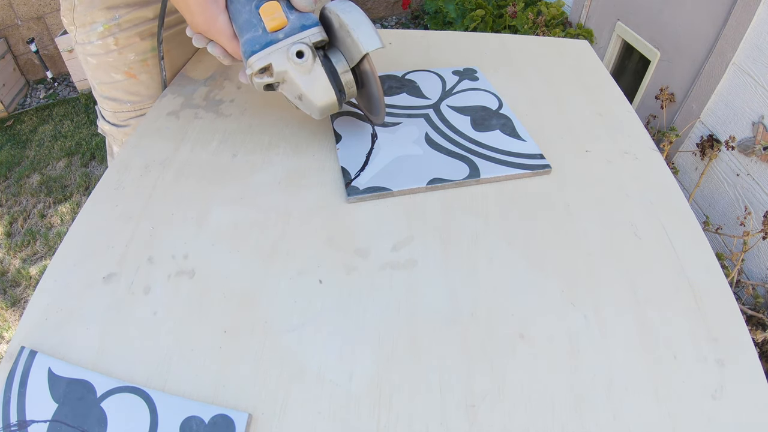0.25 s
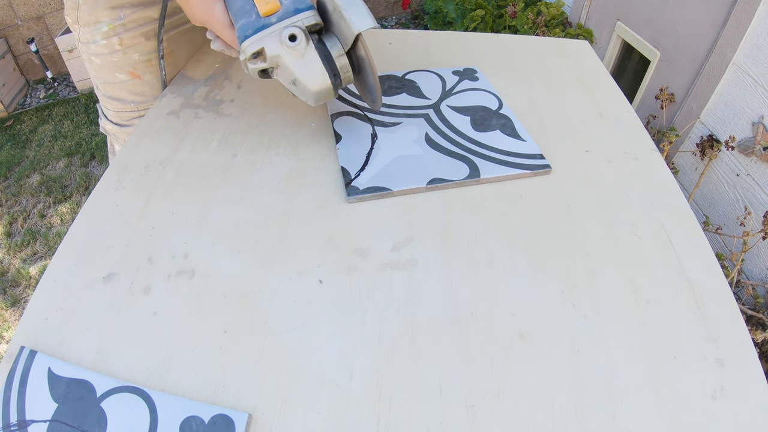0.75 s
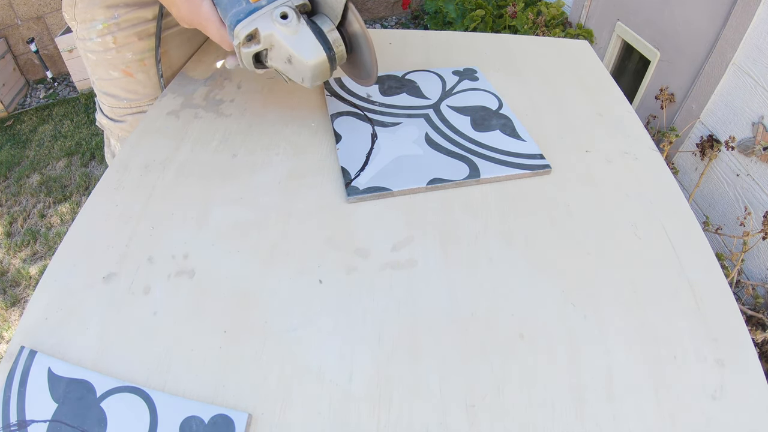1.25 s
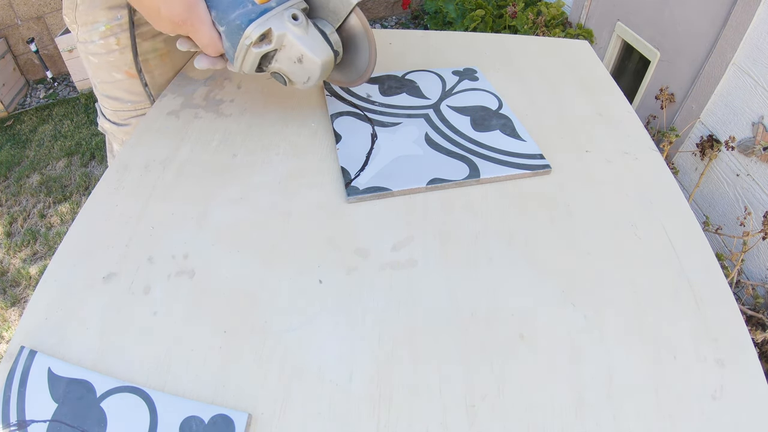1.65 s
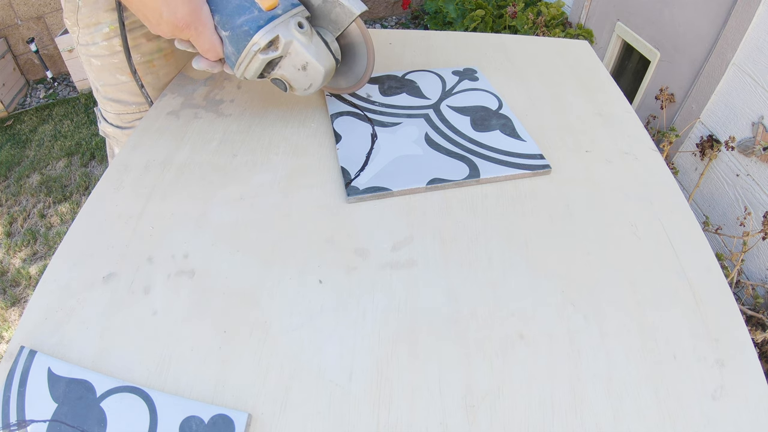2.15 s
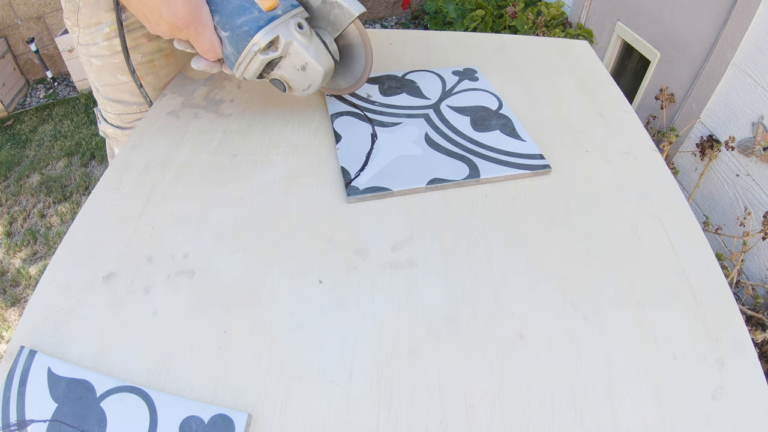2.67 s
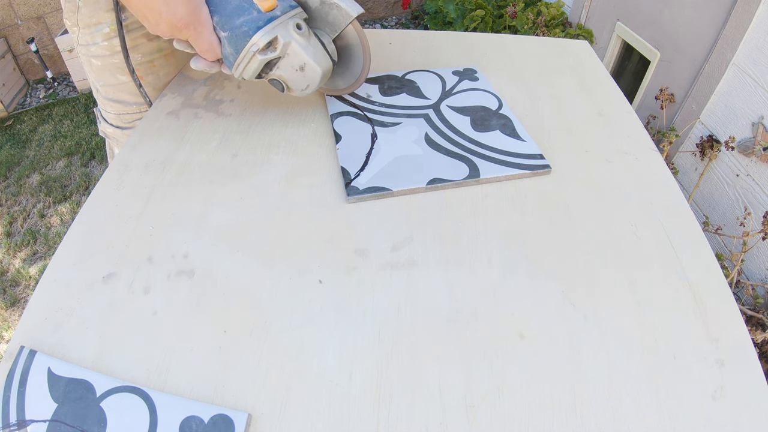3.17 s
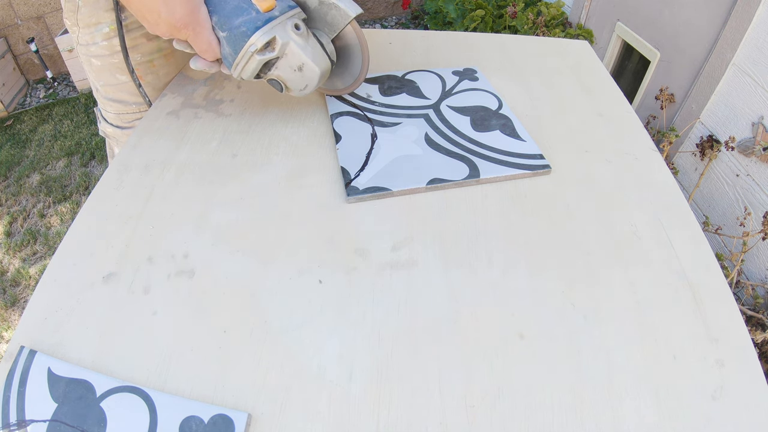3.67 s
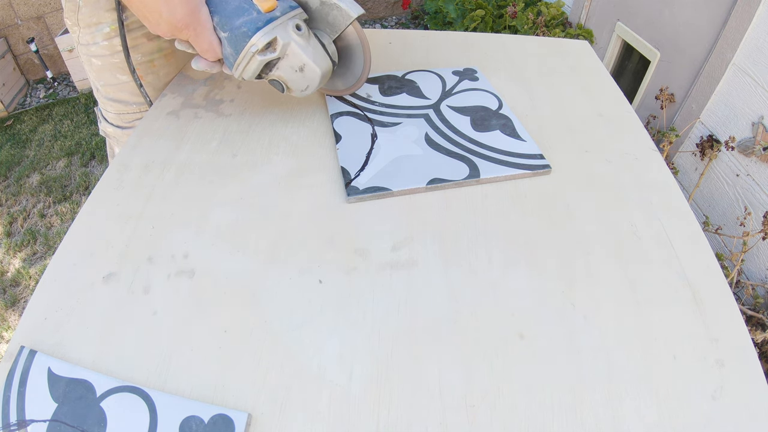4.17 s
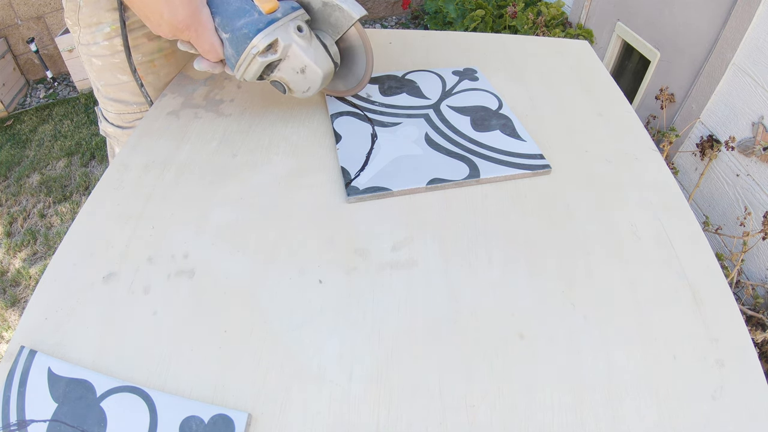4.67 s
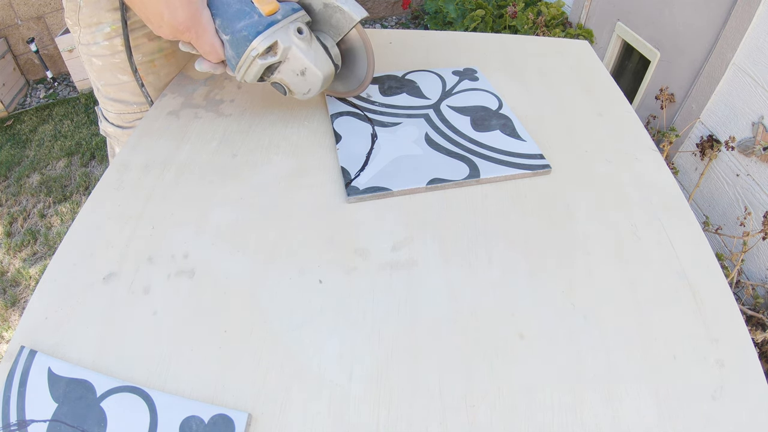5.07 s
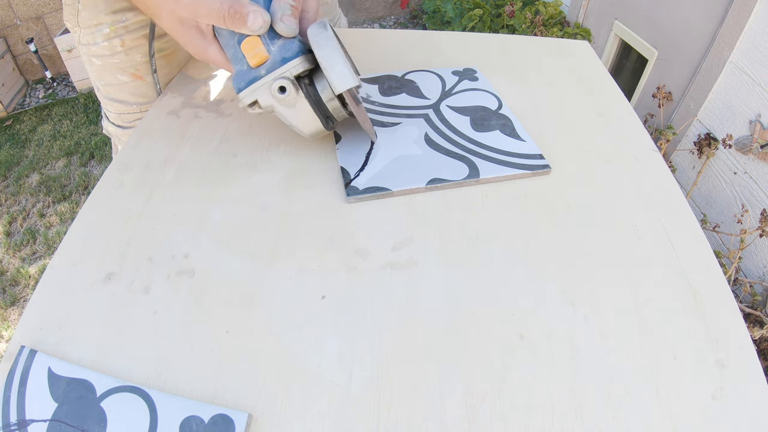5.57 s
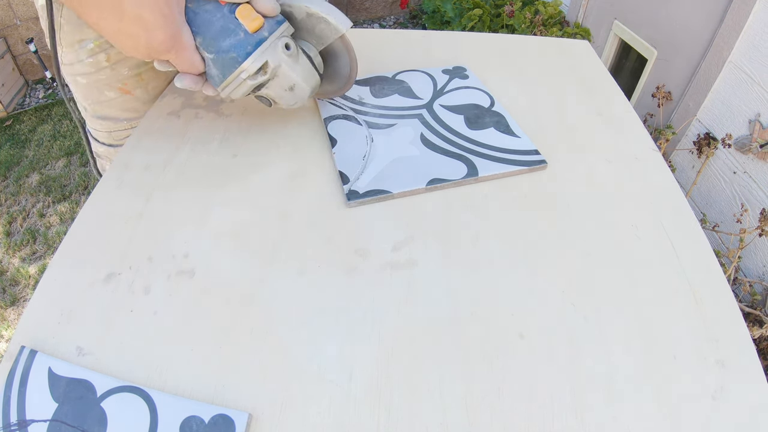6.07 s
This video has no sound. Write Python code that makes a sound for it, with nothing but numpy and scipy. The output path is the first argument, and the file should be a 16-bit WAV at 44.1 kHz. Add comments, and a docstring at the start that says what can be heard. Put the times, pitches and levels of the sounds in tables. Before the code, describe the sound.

Outdoors, a hand-held angle grinder runs with a whine and a rushing roar, its pitch rising slightly as a soft puff of wind passes. About halfway through, the disc bites into a ceramic tile with a rough chatter and high ringing. Near the end the sound switches abruptly to a thin, much higher whine with light scraping, hiss and a few brief squeals, dipping once as the rim lifts and sets in again.

```python
"""A hand-held angle grinder runs up outdoors, then bites into a ceramic tile on a table.
The motor gives shaft tones and fan roar; a puff of wind passes at the start. In the cut the disc
chatters: its rim strikes once a turn and rubs in between, ringing disc, tile and table top.
The sound then jumps to a thin, much faster whine with light scraping, hiss and brief high tones;
the rim lifts off for a moment and sets in again."""
import sys
import numpy as np
from scipy import signal
from scipy.fft import rfft, irfft
from scipy.io import wavfile
from scipy.ndimage import uniform_filter1d

SR = 44100
rng = np.random.default_rng(int(sys.argv[2]) if len(sys.argv) > 2 else 0)


def store_wav(level_fs):
    """Save 16-bit WAV to argv[1]."""
    pcm = np.round(np.clip(np.atleast_2d(level_fs), -1, 1) * 32767)
    wavfile.write(sys.argv[1], SR, pcm.T.astype(np.int16))


N = 279153

FULL_HZ, START_DEFICIT_HZ, RUN_UP_TAU_S = 509, 40.01, .72  # armature speed
GEAR_RATIO = .341  # disc turns per armature turn
CHATTER_HZ = (79.6, 93.2)  # two beating disc wobbles; their phases sum to the disc angle
RING_SLOPE_ORIGIN_S = 3.04  # the ringing's gradual rise or fade counts from here
SINK_S, JUMP_S, LIFT_S, LAND_S = 3.255, 5.192, 6.031, 6.152
GRAZE_DB, BITE_DB = -45, -37.5
WHINE_REF_DB, SCRAPE_REF_DB = -34.5, -41.5
STEREO_ABOVE_HZ, CUTOFF_HZ = 10900, 15790

# wind puff (time [s], level [dB])
WIND_ENVELOPE = [(0, -47.5), (.2, -61), (.35, -49.5), (.5, -64), (.7, -75)]
# hiss spectra (frequency [Hz], relative density [dB])
AIRY_SPECTRUM = [(300, -25), (1000, -24), (3500, -13), (8000, -2), (12000, -9), (15700, 2.5)]
STEADY_SPECTRUM = [(200, -21), (1000, -3), (6000, 0), (12000, -7), (15700, 0)]
# brief high tones (start [s], length [s], pitch [Hz], glide [Hz/s], level [dB])
BRIEF_TONES = [(5.605, .035, 1110, 0, -42), (5.605, .035, 4440, 0, -41), (5.605, .035, 2220, 0, -51),
               (5.92, .11, 4750, 300, -50), (6.155, .055, 1650, 0, -47), (6.16, .05, 5150, 0, -47),
               (6.155, .04, 1210, 0, -51), (6.21, .025, 1190, 0, -48), (6.245, .02, 1190, 0, -48),
               (6.272, .09, 1225, -700, -43), (6.25, .11, 4640, -1500, -42), (5.39, .12, 2760, 0, -48),
               (5.25, .03, 2750, 0, -46)]
# light scraping (time [s], scrape level [dB], treble level [dB])
SCRAPE_ENVELOPE = [(5.195, -44, -50), (5.26, -36.5, -46), (5.32, -40, -46), (5.48, -41.5, -55),
                   (5.62, -38, -69), (5.83, -46.5, -53), (6.02, -44.5, -56), (6.05, -45, -56),
                   (6.147, -43, -46.5), (6.175, -34, -42.5), (6.26, -43, -50), (6.33, -37.5, -48)]
# scrape resonances (frequency [Hz], width [Hz], gain [dB])
SCRAPE_LOW_BANDS = [(730, 380, -22), (1190, 640, -5), (1630, 74, -11), (2194, 210, -11.5), (2710, 590, 3)]
SCRAPE_HIGH_BANDS = [(3430, 190, -9), (4350, 370, -4), (6040, 1400, -17)]
# gliding scrape resonance (time [s], frequency [Hz], gain [dB])
RASP_TRACK = [(5.195, 4650, -8), (5.55, 4600, -4), (5.75, 4660, -1.5), (6.03, 4850, -1), (6.15, 4820, -6),
              (6.33, 4570, -5)]
# whine, slowed by pressure, faster in the lift (time [s], pitch [Hz], level [dB])
WHINE_TRACK = [(5.195, 3474, -47), (5.27, 3433, -43), (5.5, 3376, -35.5), (5.77, 3286, -32),
               (5.88, 3230, -43.5), (6.0, 3255, -37), (6.031, 3220, -36), (6.07, 3400, -41),
               (6.11, 3470, -37), (6.15, 3510, -43), (6.2, 3456, -34), (6.33, 3310, -40)]
# whine overtones (multiple [1], level [dB], share of whine swell [1], change in lift [dB])
WHINE_OVERTONES = [(2., -57, .8, -6), (2.921, -61, -0.3, 11), (3.001, -70, .5, -20), (3.62, -72, .1, -5),
                   (4., -72, .1, 3)]
# fan and gear roar (frequency [Hz], relative density [dB])
ROAR_SPECTRUM = [(30, -25), (98, -23.5), (170, -15.5), (300, -16.5), (460, -13.5), (1000, -9.5),
                 (1300, -15), (3000, -1.5), (4700, -5), (6500, -1.5), (8500, -22.5), (10900, -44),
                 (13500, -33), (15700, -38)]
# housing cavities (frequency [Hz], width [Hz], gain [dB])
HOUSING_MODES = [(395.5, 120, -23.5), (2930, 210, -17.5), (4460, 130, -27), (5500, 210, -14),
                 (6640, 530, -34)]
# armature tones (time [s], order 1 [dB], order 2 [dB], order 3 [dB])
ARMATURE_LEVELS = [(0, -47, -46.5, -65), (.3, -41, -44, -55), (.8, -43, -46, -48.5), (1.6, -46, -59, -51.5),
                   (1.8, -50, -56, -48.5), (3.2, -47.5, -52, -46.5), (3.35, -58, -71, -54),
                   (5.195, -60.5, -66, -57)]
# resonances rung in the cut (frequency [Hz], width [Hz], gain [dB])
TABLE_MODES = [(50, 68, -7), (123.5, 25, -6), (231.3, 27, -5)]
TILE_MODES = [(790, 125, -4.5), (1217, 37, -10), (1827, 125, -5), (1900, 30, -11.5), (2955, 25, -2),
              (3340, 420, 2), (3580, 270, 5), (4444, 66, -2.5)]
GUARD_BANDS = [(6040, 630, -1.5), (4300, 330, -11)]
DISC_LOW_MODES = [(5150, 127, 0), (5400, 55, -7.5)]
DISC_MID_MODES = [(6574, 45, -7.5), (6625, 32, -6), (6715, 94, -6), (7470, 32, -17.5), (7600, 60, -22.5),
                  (8070, 130, -24)]
DISC_TOP_MODES = [(9670, 40, -9), (10150, 120, -6), (10580, 55, -14), (11600, 55, -15), (12620, 55, -6),
                  (12980, 36, -12), (13550, 31, -11), (13980, 90, -2), (14300, 250, -8), (14620, 40, -14),
                  (15130, 60, -13), (15400, 40, -13), (15680, 40, -12)]
# how freely the disc sings (time [s], swell [dB])
SING_ENVELOPE = [(3.15, 1), (3.3, -1.5), (3.6, 1), (3.85, 1), (3.98, 5), (4.2, 0.5), (4.45, 0.5), (4.8, 0),
                 (5.195, 0)]


def gain_of(db):
    """Decibels to amplitude."""
    return 10 ** (np.asarray(db) / 20)


def unit_rms(x):
    """Scale to rms 1."""
    return x / np.sqrt(np.mean(x ** 2) + 1e-20)


def between(start_s, end_s, edge_s):
    """Gate with linear edges."""
    t = np.arange(N) / SR
    return np.clip(np.minimum(t - start_s, end_s - t) / edge_s + .5, 0, 1)


def curves(rows):
    """Gate over a table's time span, then its columns per sample."""
    times_s, *values = np.transpose(rows)
    t = np.arange(N) / SR
    gate = np.clip(np.minimum(t - times_s[0], times_s[-1] - t) / .003 + 1, 0, 1)
    return gate, *(np.interp(t, times_s, v) for v in values)


def wander(cutoff_hz):
    """Low-passed random drift, rms 1."""
    hz = np.fft.rfftfreq(N, 1 / SR)
    return unit_rms(irfft(rfft(rng.standard_normal(N)) / (1 + (hz / cutoff_hz) ** 4), N))


def resonate(x, hz, width_hz, passes=2):
    """Fixed or gliding resonance, rms 1: shift to 0 Hz, smooth, shift back."""
    carrier = np.exp(2j * np.pi * np.cumsum(hz * np.ones(N)) / SR)
    pole = np.exp(-np.pi * width_hz / SR)
    for _ in range(passes):
        x = unit_rms((carrier * signal.lfilter([1 - pole], [1, -pole], x / carrier)).real)
    return x


def ring(x, modes):
    """Sum of resonances driven by x."""
    return sum(gain_of(db) * resonate(x, hz, width_hz) for hz, width_hz, db in modes)


def noise(spectrum, patchy_db):
    """Shaped noise with drifting spectral patches, rms 1."""
    bins_hz = np.fft.rfftfreq(1024, 1 / SR)
    hz, db = np.transpose(spectrum)
    real, imag, patches = rng.standard_normal((N // 256 + 5, 513, 3)).T
    patches = unit_rms(uniform_filter1d(uniform_filter1d(patches, 10, 0), 8, 1))
    shape_db = np.interp(np.log(bins_hz + 1), np.log(hz + 1), db)[:, None]
    frames = (real + 1j * imag) * gain_of(shape_db + patchy_db * patches)
    return unit_rms(signal.istft(frames, nperseg=1024, noverlap=768)[1][:N])


def orders(hz, multiples, levels_db, waver_hz):
    """Sines at multiples of a wavering frequency."""
    turns = np.cumsum(hz + waver_hz * wander(40)) / SR
    return sum(np.sqrt(2) * gain_of(db) * np.sin(2 * np.pi * k * turns)
               for k, db in zip(multiples, levels_db))


def wind():
    """Low, lumpy puff of wind."""
    gate, db = curves(WIND_ENVELOPE)
    return gate * gain_of(db) * wander(99)


def hiss(lifted):
    """Steady hiss, top fizz, and an airy hiss boosted in the lift."""
    _, _, treble_db = curves(SCRAPE_ENVELOPE)
    airy = gain_of(treble_db + 2 + 8 * lifted) * noise(AIRY_SPECTRUM, patchy_db=5.5)
    steady = gain_of(-56.5) * noise(STEADY_SPECTRUM, patchy_db=-2)
    fizz = gain_of(treble_db) * resonate(rng.standard_normal(N), hz=15170, width_hz=1800)
    return airy + steady + fizz


def brief_tones():
    """Brief wavering high tones in the sped-up grinding."""
    out, waver_hz = np.zeros(N), 35 * wander(74)
    for start_s, length_s, hz, glide_hz_per_s, db in BRIEF_TONES:
        t = np.arange(0, length_s, 1 / SR)
        pitch_hz = hz + glide_hz_per_s * t + waver_hz[round(hz):][:len(t)]
        tone = np.sqrt(2) * gain_of(db) * np.sin(2 * np.pi * np.cumsum(pitch_hz) / SR)
        slot = out[round(start_s * SR):][:len(t)]
        slot += (tone * signal.windows.tukey(len(t), .5))[:len(slot)]
    return out


def scrape(lifted):
    """Light rim contact: grainy noise through fixed bands and one gliding rasp."""
    _, scrape_db, _ = curves(SCRAPE_ENVELOPE)
    _, rasp_hz, rasp_db = curves(RASP_TRACK)
    grain = gain_of(1.66 * wander(97) + 1.05 * wander(27))
    grit = unit_rms(grain * rng.standard_normal(N)) * gain_of(-18 * lifted)
    rasp = gain_of(rasp_db) * resonate(grit, rasp_hz, width_hz=280)
    low = gain_of(-48 + .52 * (scrape_db - SCRAPE_REF_DB)) * ring(grit, SCRAPE_LOW_BANDS)
    return low + gain_of(scrape_db) * (ring(grit, SCRAPE_HIGH_BANDS) + rasp)


def whine(lifted):
    """Thin whine with overtones; the 3rd harmonic flares, hissy, before the lift."""
    _, hz, whine_db = curves(WHINE_TRACK)
    multiples, levels_db = [1], [whine_db - 23 * lifted]
    for multiple, db, share, lift_db in WHINE_OVERTONES:
        multiples.append(multiple)
        levels_db.append(db + share * (whine_db - WHINE_REF_DB) + lift_db * lifted)
    tones = orders(hz, multiples, levels_db, waver_hz=3)
    flare = between(5.785, 6.03, edge_s=.02)
    tones += flare * orders(hz, [3], levels_db=[-53], waver_hz=4.3)
    skirt = resonate(rng.standard_normal(N), 3 * hz, width_hz=400, passes=1)
    return tones + (gain_of(-67) + flare * gain_of(-54.5)) * skirt


def fast_grinding():
    """Whine, scrape, hiss and a faint low tone; all dip briefly as the rim lifts."""
    gate, _, _ = curves(WHINE_TRACK)
    lifted = between(LIFT_S, LAND_S, edge_s=.0084)
    dip_db = -8.5 * between(LIFT_S, LIFT_S + .032, edge_s=.015)
    grinding = whine(lifted) + scrape(lifted) + hiss(lifted)
    low_tone = orders(hz=540, multiples=[1], levels_db=[-73], waver_hz=3.87)
    return gate * gain_of(dip_db) * (grinding + low_tone)


def motor():
    """Armature tones, disc hum, and fan roar that throbs per disc turn and drops under load."""
    gate, *levels_db = curves(ARMATURE_LEVELS)
    armature_hz = FULL_HZ - START_DEFICIT_HZ * np.exp(-np.arange(N) / SR / RUN_UP_TAU_S)
    spindle = np.sin(2 * np.pi * np.cumsum(armature_hz * GEAR_RATIO) / SR)
    air = rng.standard_normal(N)
    whoosh = gain_of(-5.5) * resonate(air, 6.81 * armature_hz, width_hz=360)
    roar = noise(ROAR_SPECTRUM, patchy_db=.5) + ring(air, HOUSING_MODES) + whoosh
    throb_db = 1.3 * spindle + .91 * wander(88)
    loaded = between(SINK_S + .04, N / SR, edge_s=.089)
    roar = unit_rms(roar * gain_of(throb_db)) * gain_of(-26.5 - 6.5 * loaded)
    tones = orders(armature_hz, (1, 2, 3), levels_db, waver_hz=2.1)
    return gate * (tones + gain_of(-57.5) * spindle + roar)


def disc_ring(rub, sing_db, slope_s):
    """Rubbed disc modes; each group swells and drifts at its own rate."""
    mid_db = 5.85 + .93 * sing_db + .5 * slope_s + 1.2 * wander(12)
    top_db = -19 + .9 * sing_db - 4 * slope_s + 2.5 * wander(40)
    lone_mode_db = 1.7 + 1.4 * sing_db - 2 * slope_s
    low_db = -1.9 + .2 * sing_db + 1.6 * slope_s
    return (gain_of(low_db) * ring(rub, DISC_LOW_MODES)
            + gain_of(lone_mode_db) * resonate(rub, hz=5898, width_hz=44)
            + gain_of(mid_db) * ring(rub, DISC_MID_MODES)
            + gain_of(top_db) * ring(rub, DISC_TOP_MODES))


def cutting():
    """The rim grazes, then sinks in; strikes and rubbing ring tile, guard, disc and table."""
    gate, sing_db = curves(SING_ENVELOPE)
    slope_s = np.arange(N) / SR - RING_SLOPE_ORIGIN_S
    contact_db = GRAZE_DB + (BITE_DB - GRAZE_DB) * between(SINK_S, N / SR, edge_s=.03)
    wobbles_rad = [2 * np.pi * np.cumsum(hz + 2.985 * wander(7.92)) / SR for hz in CHATTER_HZ]
    disc_rad = sum(wobbles_rad)
    beat_db = 6.2 * np.cos(wobbles_rad).sum(axis=0) + 2.2 * wander(53)
    strength = gain_of(np.minimum(beat_db, 7))
    strikes = np.diff(np.floor(disc_rad / (2 * np.pi)), prepend=0) * rng.choice([-1., 1.], N)
    spray = strength * gain_of(5.2 * np.cos(disc_rad)) * rng.standard_normal(N)  # flying grit
    chatter = unit_rms(.52 * unit_rms(strength * strikes) + unit_rms(spray))
    rub = unit_rms(chatter + 1.47 * rng.standard_normal(N))
    disc = disc_ring(rub, sing_db, slope_s)
    hum = gain_of(.5 + 2.7 * wander(18)) * np.sin(disc_rad)
    table = gain_of(-2.15 + .3 * sing_db - .44 * slope_s) * (ring(chatter, TABLE_MODES) + hum)
    tile, guard = ring(chatter, TILE_MODES), ring(spray, GUARD_BANDS)
    return gate * gain_of(contact_db) * (tile + guard + disc + table)


def scene():
    """Tile cut, then fast grinding; the cut's top treble is diffuse and leans left."""
    tile_cut = (motor() + wind() + cutting()) * between(-1, JUMP_S, edge_s=.004)
    highpass = signal.firwin(511, STEREO_ABOVE_HZ, pass_zero=False, fs=SR)
    treble = signal.oaconvolve(tile_cut, highpass, "same")
    taps = rng.standard_normal(2000)
    diffuse = signal.oaconvolve(treble, taps / np.linalg.norm(taps), "same")
    side = .27 * treble + .82 * diffuse + gain_of(-100) * rng.standard_normal(N)
    mid = tile_cut + fast_grinding() + brief_tones()
    return np.array([mid + side, mid - side])


def record(dry):
    """Steep low-pass."""
    lowpass = signal.firwin(1023, CUTOFF_HZ, window=("kaiser", 10), fs=SR)
    return signal.oaconvolve(dry, lowpass[None], "same")


dry = scene()
out = record(dry)
store_wav(out)
```